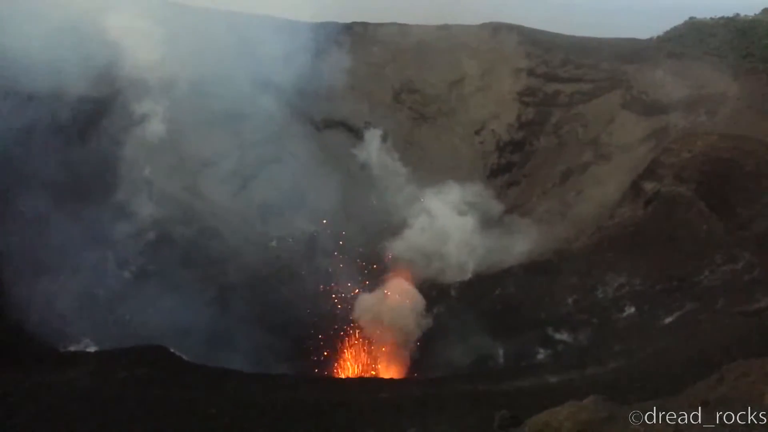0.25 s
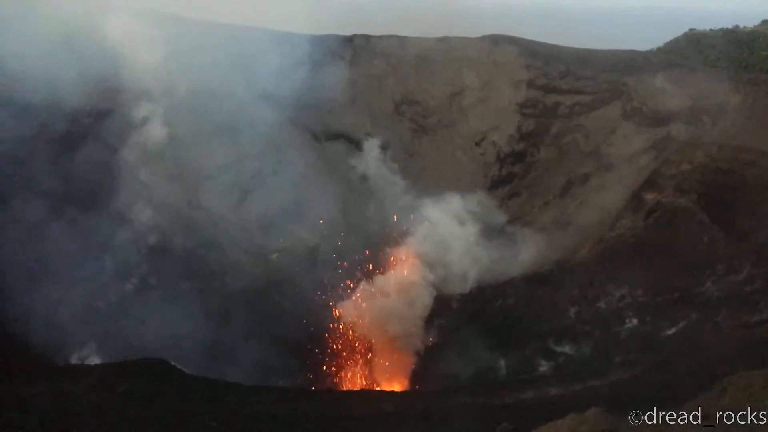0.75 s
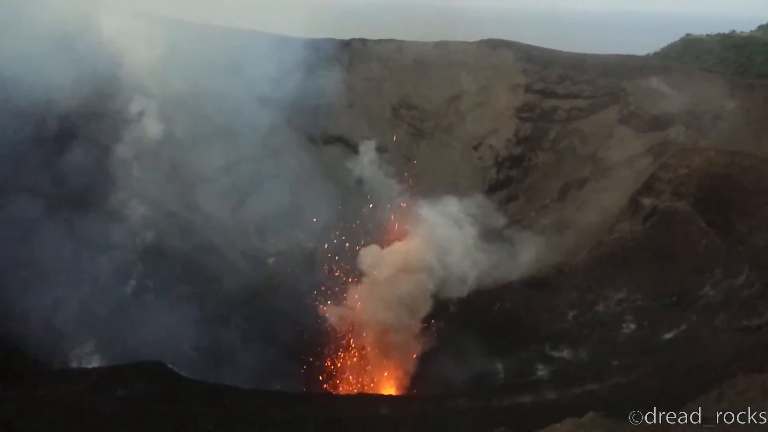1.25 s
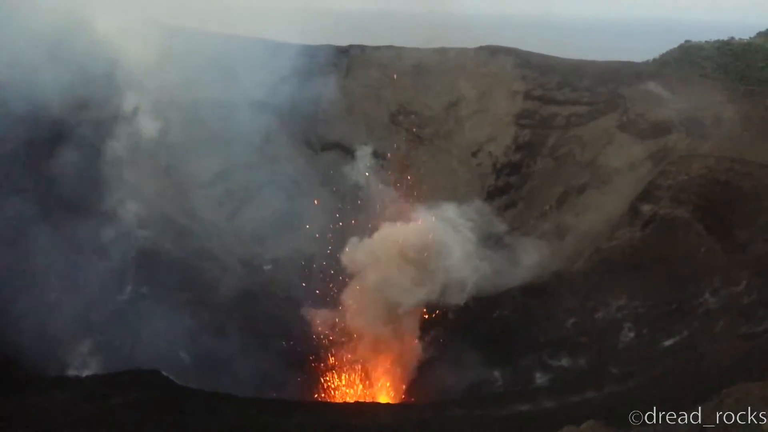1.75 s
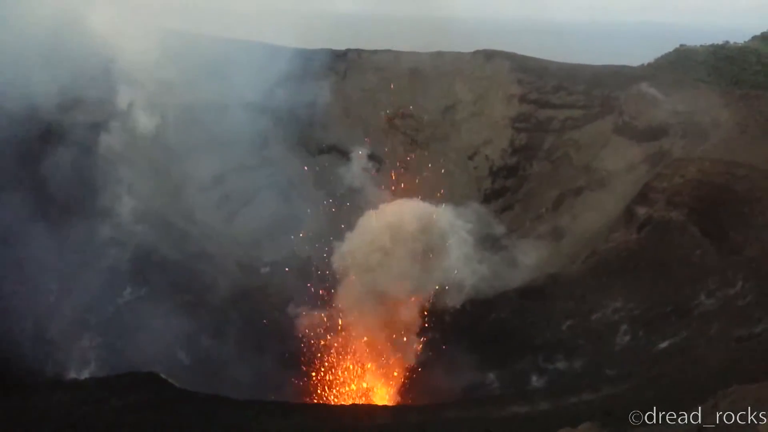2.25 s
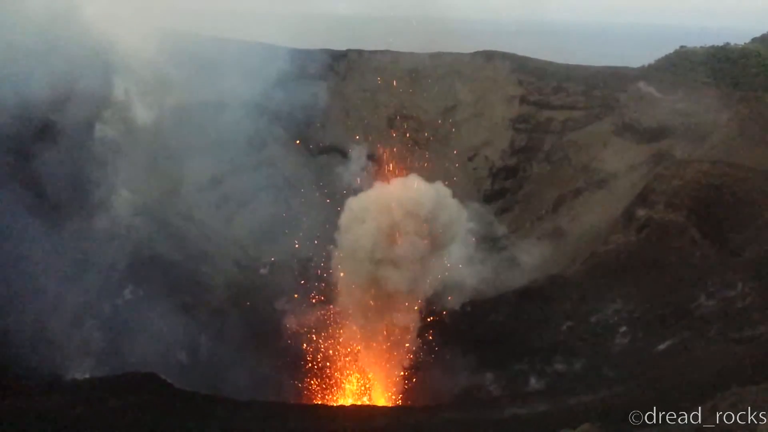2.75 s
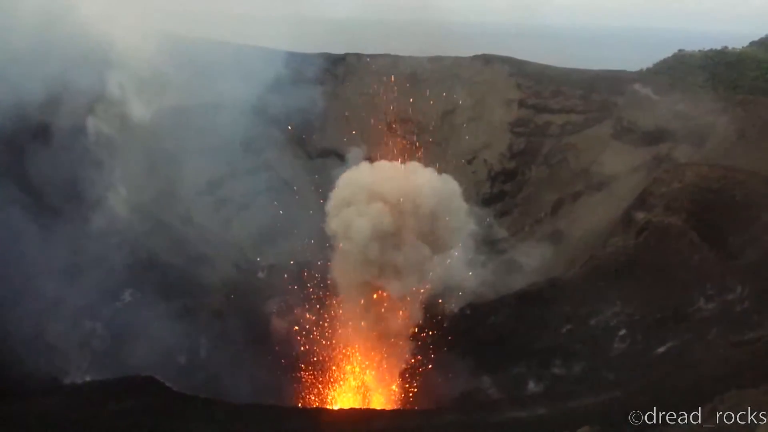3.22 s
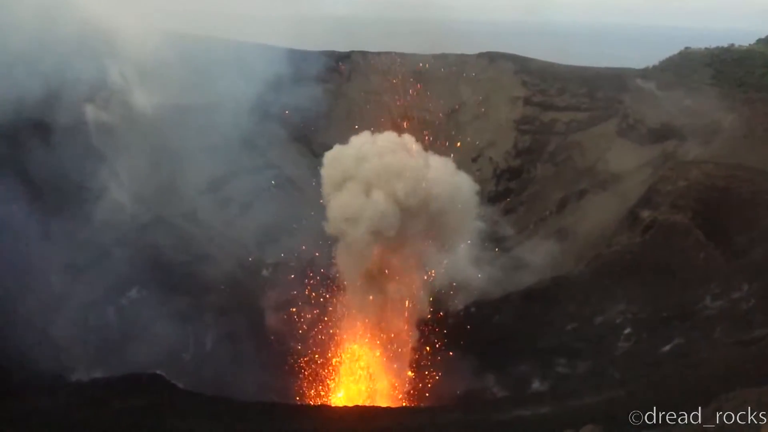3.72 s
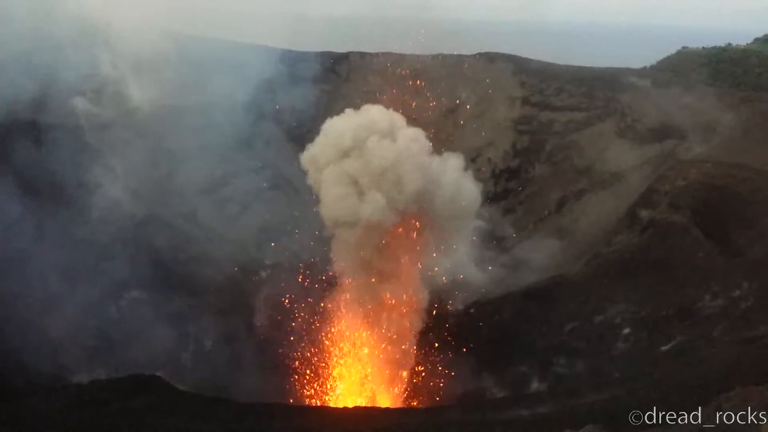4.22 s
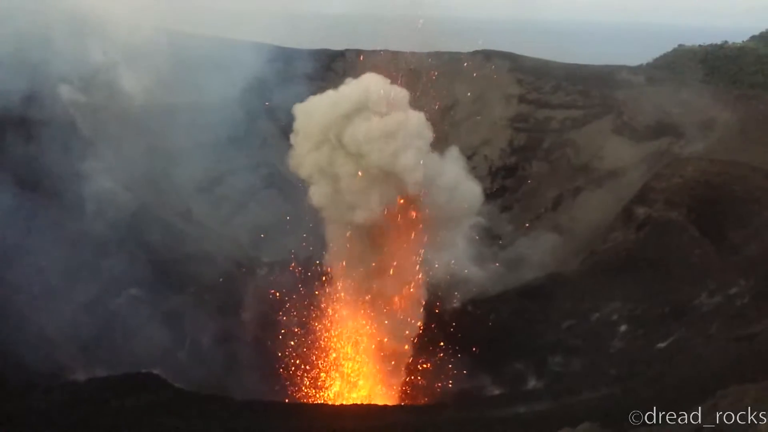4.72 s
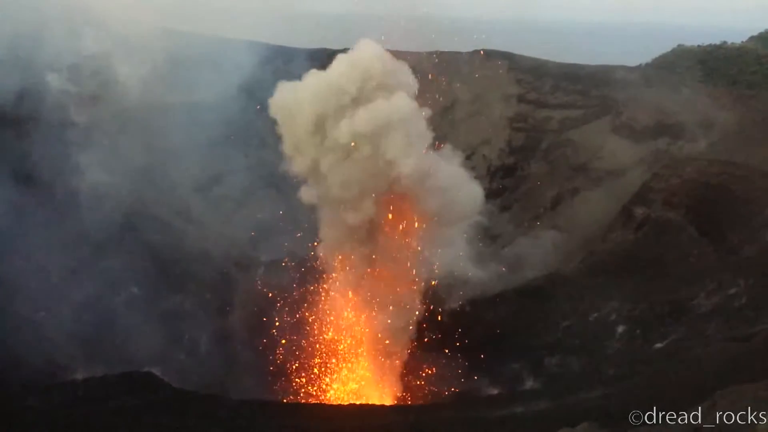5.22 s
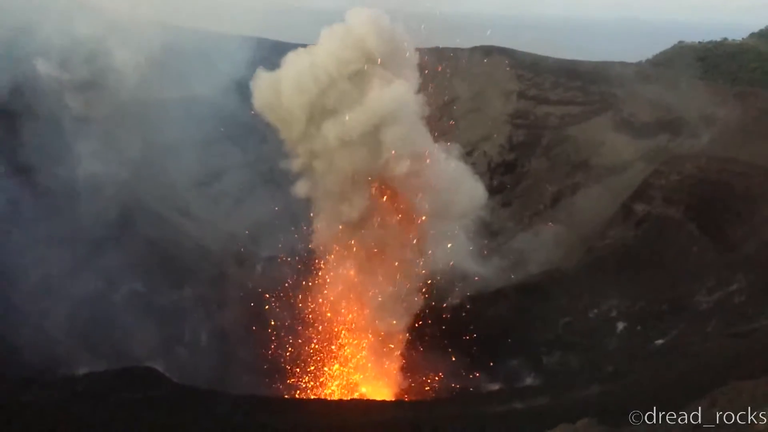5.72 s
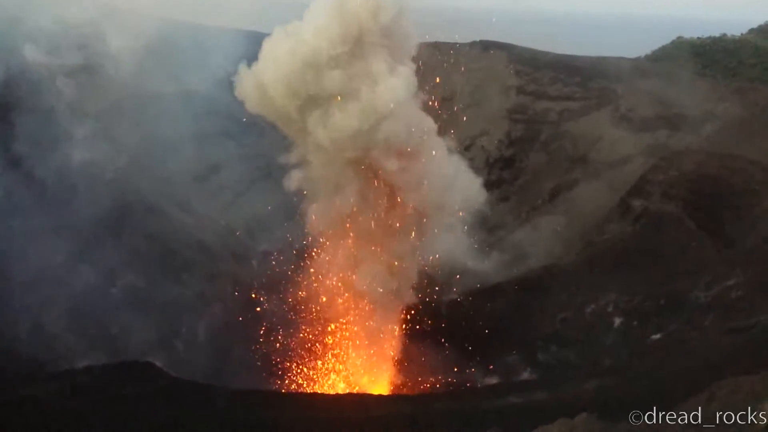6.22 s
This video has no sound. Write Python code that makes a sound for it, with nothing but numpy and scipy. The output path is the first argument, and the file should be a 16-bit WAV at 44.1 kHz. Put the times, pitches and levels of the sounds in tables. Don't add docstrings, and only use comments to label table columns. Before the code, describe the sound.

Outdoors on a crater rim, wind buffets a small unprotected recorder over faint distant hiss. After a fifth of a second a volcanic vent blasts open with a heavy boom, then keeps jetting gas, ash and lava in a dense low rumble with rough roar and softer hiss. It surges in the middle and weakens late. Sharp wind slaps hit mostly the left side at the start and finish.

```python
import sys
import numpy as np
from scipy import signal
from scipy.io import wavfile
from scipy.ndimage import uniform_filter1d, minimum_filter1d

SR = 44100
rng = np.random.default_rng(int(sys.argv[2]) if len(sys.argv) > 2 else 0)


def wrap_up_sound(samples):
    columns = np.atleast_2d(samples).T
    tamed = np.clip(columns, -1, 1)
    steps = np.round(tamed * 32767).astype(np.int16)
    wavfile.write(sys.argv[1], SR, steps)


def natural_amplitude(level_db):
    exponent = np.asarray(level_db, float) / 20
    return 10 ** exponent


N = 285591


def in_time(rows):
    s, *columns = np.transpose(rows)
    return [np.interp(np.arange(N) / SR, s, column) for column in columns]


def at_hz(points, hz):
    table_hz, value = np.transpose(points)
    return np.interp(np.log(hz), np.log(table_hz), value)


def rms_one(x):
    return x / np.sqrt(np.mean(x ** 2) + 1e-20)


def drift(rate_hz):
    r = np.exp(-40 * np.pi * rate_hz / SR)
    slow = signal.lfilter([1], [1, -2 * r, r * r], rng.standard_normal(N // 20 + 4002))[4000:]
    return np.interp(np.arange(N) / 20, np.arange(len(slow)), rms_one(slow))


def butter(x, hz, kind, order=2):
    return signal.sosfilt(signal.butter(order, hz, kind, fs=SR, output="sos"), x)


def port(x, peaks):
    for hz, width_hz, db in peaks:
        gain = natural_amplitude(db / 2)
        a = np.pi * width_hz / SR
        middle = -2 * np.cos(2 * np.pi * hz / SR)
        x = signal.lfilter([1 + a * gain, middle, 1 - a * gain], [1 + a / gain, middle, 1 - a / gain], x)
    return x


def swells(rows, attack_s, release_s):
    t, out = np.arange(0, N + 32, 32) / SR, 0
    for s, held_s, db in rows:
        rise = np.clip((t - s) / attack_s, 0, 1)
        fall = np.exp(-np.maximum(t - s - attack_s - held_s, 0) / release_s)
        out = out + db * rise * fall
    return np.interp(np.arange(N) / SR, t, out)


# (start [s], held [s], level over calm [dB])
LEFT_GUSTS = [(-.03, 0.029, 23.5), (.06, 0.0069, 8.5), (.26, .24, 13), (.55, 0.4, 14.5), (3.8, 0.21, 9),
              (5.65, 0.06, 21), (5.85, .02, 19), (6.0, .1, 0), (6.2, 0.035, 18.5), (6.31, 0.0076, 14.5),
              (6.39, 0.045, 20)]
# (start [s], held [s], level over calm [dB])
RIGHT_GUSTS = [(-.03, .08, 20), (.26, .06, 24), (.4, .32, 16.5), (.82, .3, 12.5), (1.25, .12, 22.5),
               (1.65, .25, 12), (2.36, .04, 17), (2.62, .15, 15), (2.86, .08, 13), (3.95, .05, 3),
               (4.45, .05, 10), (5.18, .1, 7), (5.48, .1, 10), (5.85, .15, 10.5), (6.28, .1, 13)]


def wind(gusts, calm_db, low_hz, body_hz, edge_db, lumps_db):
    lumps = natural_amplitude(lumps_db * drift(22))
    body = butter(butter(rng.standard_normal(N), body_hz, "low"), low_hz, "high")
    edge = butter(rng.standard_normal(N), 1.5 * body_hz, "low", order=3)
    edge = butter(edge, 0.9 * body_hz, "high")
    rush = rms_one(lumps * rms_one(body) + natural_amplitude(edge_db) * rms_one(lumps ** 2 * edge))
    return natural_amplitude(calm_db + swells(gusts, attack_s=0.04, release_s=0.031)) * rush


# (time [s], level [dB])
FAR_HISS = [
    (0, -45),
    (.19, -45),
    (.3, -44),
    (.6, -56.5),
]


def far_hiss():
    center_hz, width_hz, wash_db, hum_db = 4020, 950, -50, -30
    edges_hz = center_hz + width_hz * np.array([-.5, .5])
    band = rms_one(butter(rng.standard_normal(N), edges_hz, "band", order=4))
    wash = butter(rng.standard_normal(N), [500, 2500], "band", order=1)
    wash = rms_one(butter(wash, 8800, "low", order=4))
    hum = rms_one(butter(rng.standard_normal(N), [45, 120], "band"))
    band_db = in_time(FAR_HISS)[0] + 0.62 * drift(40)
    return natural_amplitude(band_db) * band + natural_amplitude(wash_db) * wash + natural_amplitude(hum_db) * hum


SELF_NOISE_DB = [-73, -65]


def electronics(ticks):
    ticks = port(butter(ticks, 3500, "high"), [(5200, 900, 10), (8000, 2500, -9)])
    settling = natural_amplitude(7.2 * np.exp(-np.arange(N) / SR / 1.0))
    hiss_db = np.array(SELF_NOISE_DB)[:, None] + .8 * drift(3.1)
    hiss = natural_amplitude(hiss_db) * rng.standard_normal((2, N))
    return settling * (hiss + ticks * [[.4], [1]])


# (time [s], peak level [dB], brightness [Hz])
SLAPS = [(.019, -7, 1100), (0.056, -10, 400), (0.072, -9.5, 2200), (0.078, -4.5, 500), (0.209, -6.5, 700),
         (0.254, -7, 600), (0.268, -7, 900), (0.341, -0.5, 600), (0.355, -5, 495), (0.398, -21, 700),
         (0.426, -1, 700), (0.497, -2, 800), (5.678, -3, 1700), (5.83, -8, 1500), (5.879, -1, 800),
         (6.223, -11, 696), (6.298, -13, 800), (6.339, -2, 900), (6.361, -15, 600), (6.414, -1.5, 500),
         (6.424, -6, 900), (6.446, -13, 700)]


def slaps():
    puff_db, puff_s = -25, 0.006
    before = 440
    out, t = np.zeros(N), np.arange(-before, 880) / SR
    for s, peak_db, hz in SLAPS:
        pull = np.exp(-(np.sqrt((t * hz * 1.37) ** 2 + 0.064) - .22))
        swing_after = 0.66 * np.exp(-((t - .003) / 0.0012) ** 2)
        swing_before = 0.26 * np.exp(-((t + 0.0012) / .0015) ** 2)
        swing = pull - swing_after - swing_before
        ringing = (t > 0) * np.exp(-np.maximum(t, 0) / 0.0073)
        flutter = ringing * np.sin(2 * np.pi * rng.uniform(387, 660) * t)
        air = rms_one(butter(rng.standard_normal(len(t)), [300, 1.51 * hz], "band", order=3))
        puff = natural_amplitude(puff_db) * np.exp(np.minimum(t / 0.0018, -t / puff_s)) * air
        at = round(s * SR) - before
        out[at:at + len(t)] -= natural_amplitude(peak_db) * (swing - 0.22 * flutter + puff)
    return out


# (pitch [Hz], level per Hz [dB])
VENT = [(15, -57), (25, -27), (47, -1.5), (75, -1.5), (128, 0.5), (237, -4), (333, -7), (481, -16),
        (557, -13), (803, -16), (1370, -19), (1670, -19), (1940, -27.5), (5140, -34), (8590, -75.5),
        (11200, -89), (18900, -120)]
# (pitch [Hz], share [0-1])
LIKENESS = [(100, .995), (1000, .98), (3000, .9), (4500, .8), (6000, .5)]
# (pitch [Hz], width [Hz], level [dB])
LEFT_PORT = [(524.4, 160, -14), (766, 300, 4), (1337, 263, -8), (1650, 300, 4), (1960, 188, -6),
             (2447, 150, -4), (3056, 170, -6.5), (3735, 83, -8), (4410, 190, -2.5), (4840, 440, 3.5),
             (5225, 170, 8)]
# (pitch [Hz], width [Hz], level [dB])
RIGHT_PORT = [(150, 150, -1.5), (490, 200, -7), (1000, 300, -2), (1380, 250, 9), (1680, 250, -12),
              (1920, 200, 4), (2150, 200, -6), (2500, 350, 3), (3000, 500, -3), (3600, 300, -14),
              (4400, 700, 5), (5700, 700, -8)]


def turbulence(low_hz, high_hz, surge_db, own_db, crackle_db):
    right_db, left_lag_samples = -33, 3
    edges = np.geomspace(low_hz, high_hz, int(3 * np.log2(high_hz / low_hz)) + 2)
    surge = surge_db * drift(18) + crackle_db * drift(87)
    white, out = rng.standard_normal((2, 2, N)), 0
    for k, (low, high) in enumerate(zip(edges, edges[1:])):
        common, apart = butter(white[k % 2], [low, high], "band")
        hz = np.sqrt(low * high)
        alike = np.clip(at_hz(LIKENESS, hz), 0, 1)
        gain = natural_amplitude(at_hz(VENT, hz) + surge + own_db * drift(6.9))
        other = alike * common + np.sqrt(1 - alike ** 2) * apart
        out = out + gain * np.array([common, other])
    left = port(out[0], LEFT_PORT)
    right = natural_amplitude(right_db) * port(np.roll(out[1], -left_lag_samples), RIGHT_PORT)
    return np.array([left, right]) / np.std(left)


def evened(x, share, size):
    power = uniform_filter1d(uniform_filter1d(x[0] ** 2, size=size), size=size) + 1e-3
    out = x * power ** (-share / 2)
    return out / np.std(out[0])


# (time [s], mass flow [dB], exit speed [dB])
JET = [(.2, -4.5, -1), (.5, -2.5, -2.5), (.75, 1.5, -1), (1.3, 0.5, -0.5), (1.92, 1.5, -0.5),
       (2.02, 0.5, 0.5), (2.5, 0.5, 0.5), (3.05, 2.5, 3.5), (3.25, 2, 2), (3.36, 0.5, 2.5), (3.8, -2, 0.5),
       (3.96, -4, -2), (4.28, -3, -1.5), (4.4, -1, 1.5), (4.7, 3, 0.4), (5.33, -.7, -1.5), (5.47, -3, -0.5),
       (6.48, -3.5, -1.5)]
# (start [s], held [s], hiss level [dB], share felt in the roar
SPURTS = [(.295, 0.016, 1, 0.7), (.362, 0.02, 3.5, 0), (.57, 0.017, -0.5, .6), (.7, .03, 0.5, 1.5),
          (0.959, 0.048, 0.5, 1.36), (1.111, 0.078, 6, 0.6), (2.32, 0.049, 7, .5), (2.548, 0.045, 2.5, 1.3),
          (3.069, 0.037, 1.5, 1.8), (3.19, 0.046, 0.8, 2.5), (3.729, 0.078, 1.5, 1),
          (4.56, 0.043, 2.5, 0.6), (5.76, 0.05, 4, 0.4), (6.07, 0.024, 1.5, 0), (6.33, .17, -4, 1)]
# (start [s], held [s], boom level [dB])
HEAVES = [
    (.19, 0.069, 14.5),
    (.55, 0.31, 7.5),
    (1.26, 0.46, 6.5),
    (1.86, 0.5, 6.5),
    (2.72, 0.12, 7.5),
    (4.52, 0.45, 3.5),
    (5.2, 0.62, 9),
    (5.93, 0.055, 10),
]


def registers(since):
    boom_db, rumble_db, roar_db, hiss_db = -25, -12, -24.5, -30
    flow_db, speed_db = in_time(JET)
    spurts = [(s, held_s, db) for s, held_s, db, _ in SPURTS]
    barks = [(s, held_s, db * share) for s, held_s, db, share in SPURTS]
    spurt_db = swells(spurts, attack_s=0.0087, release_s=0.035)
    bark_db = swells(barks, attack_s=0.0087, release_s=0.035)
    heave_db = swells(HEAVES, attack_s=0.02, release_s=0.037)
    after = np.maximum(since, 0)
    roar_build_db = -20 * np.exp(-after / .07)
    hiss_build_db = -20 * np.exp(-after / 0.068)
    boom_db = boom_db + flow_db - 0.56 * speed_db + heave_db
    roar_db = roar_db + 0.34 * flow_db + 0.82 * speed_db + bark_db + roar_build_db
    hiss_db = hiss_db + speed_db + spurt_db + hiss_build_db
    return boom_db, rumble_db + flow_db, roar_db, hiss_db


def jet():
    arrives_s, rise_s, swell_db_s = 0.19, 0.0051, 450
    since = np.arange(N) / SR - arrives_s
    boom_db, rumble_db, roar_db, hiss_db = registers(since)
    boom = turbulence(22, 90, surge_db=1.0, own_db=0.0, crackle_db=0.4)
    boom = natural_amplitude(boom_db) * evened(boom, share=0.68, size=1200)
    rumble = turbulence(89.7, 519.4, surge_db=-1.55, own_db=0.27, crackle_db=0.97)
    rumble = natural_amplitude(rumble_db) * evened(rumble, share=0.21, size=500)
    roar = natural_amplitude(roar_db) * turbulence(500, 2000, surge_db=0.09, own_db=0.65, crackle_db=1.0)
    hiss = turbulence(2087, 9030, surge_db=.5, own_db=1.0, crackle_db=0.7)
    body = butter(butter(hiss, 4500, "low"), 4500, "low")
    edge = butter(butter(hiss, 4380, "high"), 4380, "high")
    force_db = uniform_filter1d(roar_db + .6 * hiss_db, size=9000) + 41.7
    fresh_db = 16 * np.exp(-np.maximum(since, 0) / 0.3)
    sharp_db = 1 + 0.37 * force_db + fresh_db
    hiss = natural_amplitude(hiss_db) * (body + natural_amplitude(sharp_db) * edge)
    front = np.clip(since / rise_s, 0, 1)
    swell = natural_amplitude(np.minimum(since, 0) * swell_db_s)
    return butter(front * (boom + rumble) + swell * (roar + hiss), 8100, "low", order=4)


# (first tick [s], period [s], peak level [dB])
TICKS = [
    (.4577, .4708, -34.5),
    (.790, 1.883, -34),
]


def tick_train():
    ticks = np.zeros(N)
    for first, period, peak_db in TICKS:
        at = (np.arange(first, N / SR, period) * SR).astype(int)
        ticks[at] = natural_amplitude(peak_db + rng.normal(0, 1.5, len(at)))
    return ticks


# (time [s], peak level [dB])
OVERLOAD = (3.2262, -23)


def overload():
    s, peak_db = OVERLOAD
    click = np.zeros((2, N))
    click[0, round(s * SR)] = natural_amplitude(peak_db)
    return butter(click, 8500, "high", order=4)


def starve(x, ticks):
    bar_db, left_lift_db, follows_treble, tick_relief_db = -67, 13, 0.34, 15
    above_hz = 7100
    window = np.sin(np.pi * (np.arange(2048) + .5) / 2048)
    hz, s, cells = signal.stft(x, SR, window, 2048, 1024)
    bands = cells[:, :1024].reshape(2, 128, 8, -1)
    power = np.sum(np.abs(bands) ** 2, axis=2) + 1e-18
    treble_db = 10 * np.log10(power[:, 12:36].sum(axis=1, keepdims=True))
    relief_db = np.zeros(len(s))
    relief_db[np.round(np.flatnonzero(ticks) / 1024).astype(int)] = tick_relief_db
    lift_db = left_lift_db * np.array([1, 0])[:, None, None]
    bar_db = bar_db + lift_db + follows_treble * treble_db - relief_db
    bar_db = bar_db + rng.normal(0, 4.1, power.shape)
    kept = (10 * np.log10(power) > bar_db) | (hz[:1024:8, None] < above_hz)
    cells[:, :1024] *= np.repeat(kept, 8, axis=1)
    return signal.istft(cells, SR, window, 2048, 1024)[1][:, :N]


def limit(x):
    ceiling, release_db_s = 0.92, 155
    fall = release_db_s * np.arange(N) / SR
    over_db = np.maximum(20 * np.log10(np.abs(x) / ceiling + 1e-9), 0)
    held_db = np.maximum.accumulate(over_db + fall, axis=1) - fall
    return x * uniform_filter1d(minimum_filter1d(natural_amplitude(-held_db), size=41), size=41)


def scene():
    left = wind(LEFT_GUSTS, calm_db=-36, low_hz=35, body_hz=175, edge_db=-7.5, lumps_db=6)
    left = left + far_hiss() + slaps()
    right = wind(RIGHT_GUSTS, calm_db=-58, low_hz=25, body_hz=300, edge_db=-10.5, lumps_db=1.0)
    return jet() + np.array([left, right])


def top_cut(x):
    return signal.sosfilt(signal.butter(12, 14700, fs=SR, output="sos"), x)


def record(dry):
    ticks = tick_train()
    mix = starve(limit(dry) + electronics(ticks), ticks) + overload()
    mix *= np.clip((N - 30 - np.arange(N)) / 70, 0, 1)
    return top_cut(mix)


dry = scene()
out = record(dry)
wrap_up_sound(out)
```